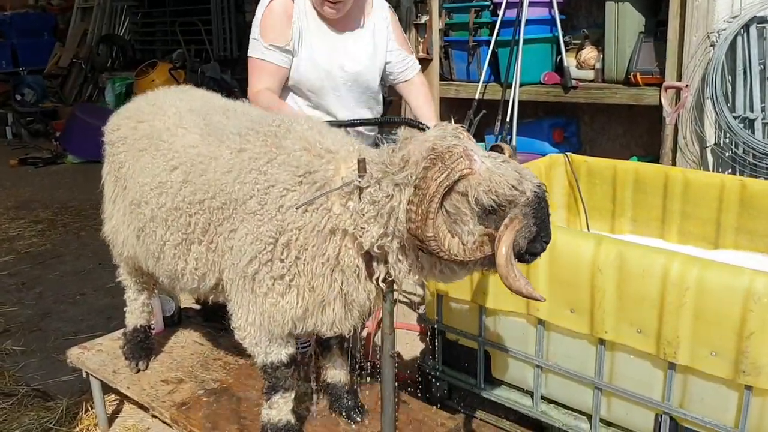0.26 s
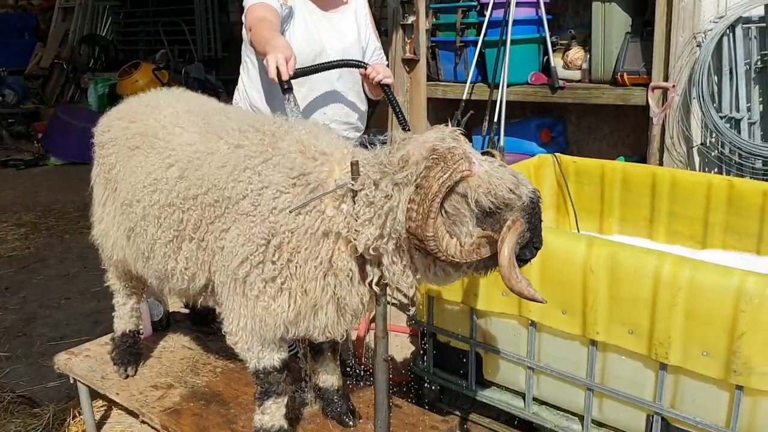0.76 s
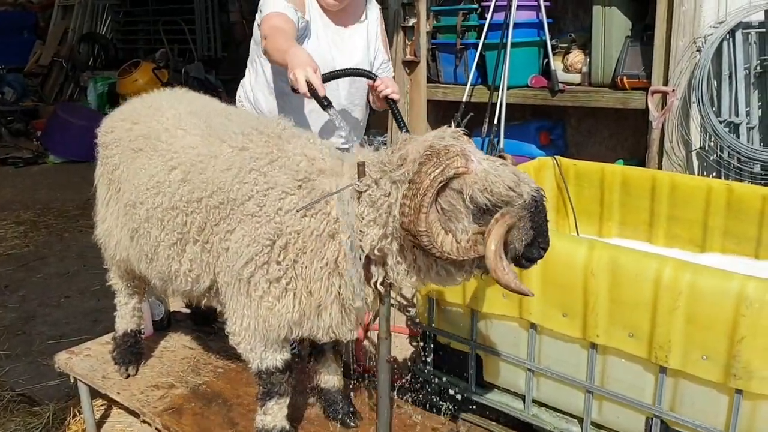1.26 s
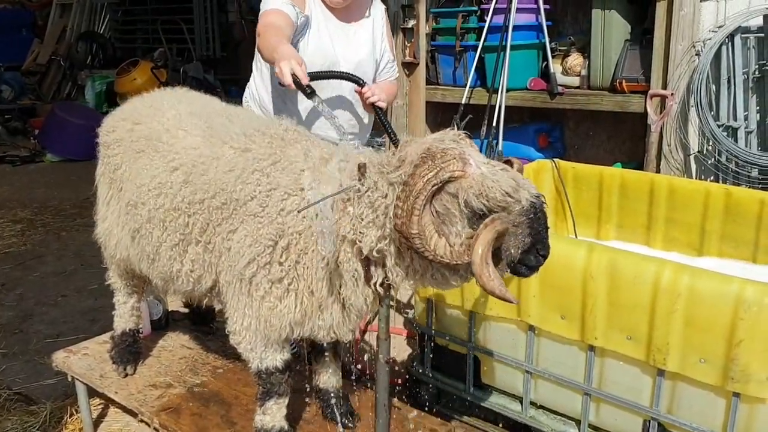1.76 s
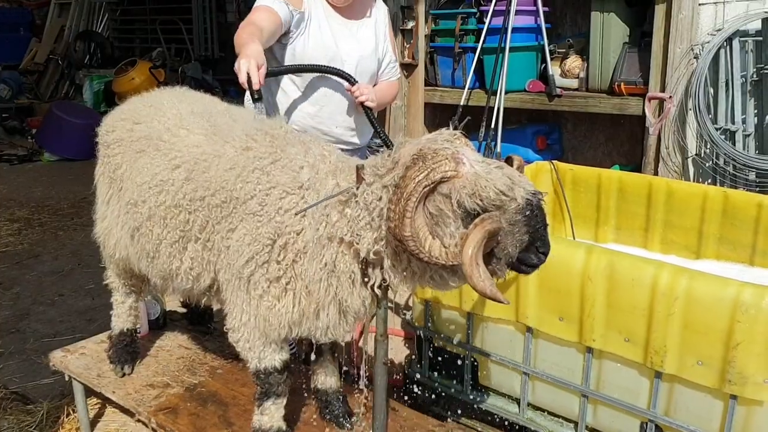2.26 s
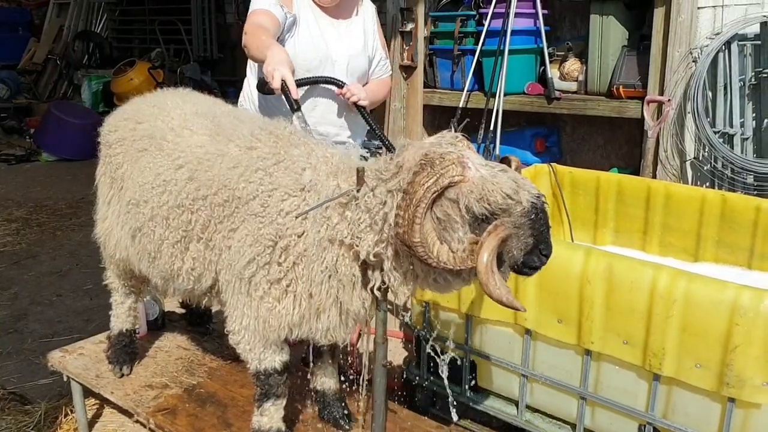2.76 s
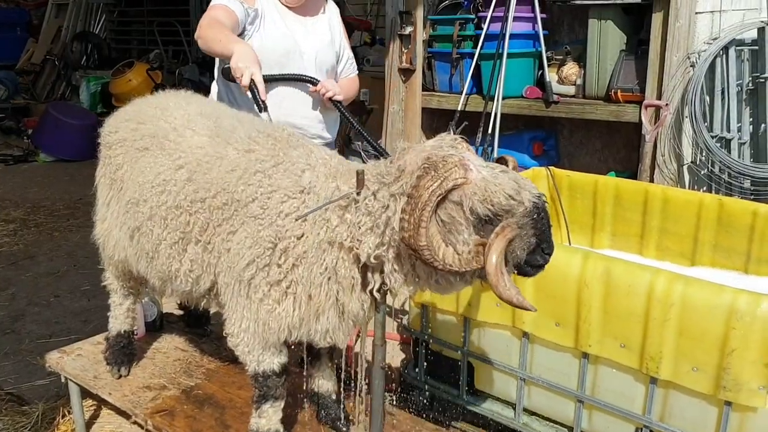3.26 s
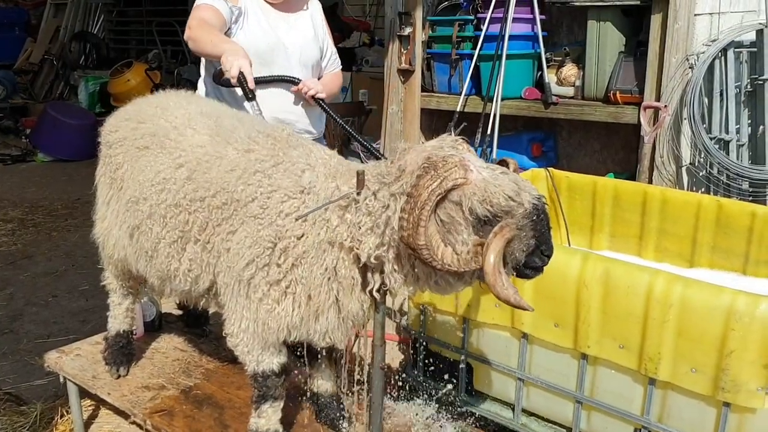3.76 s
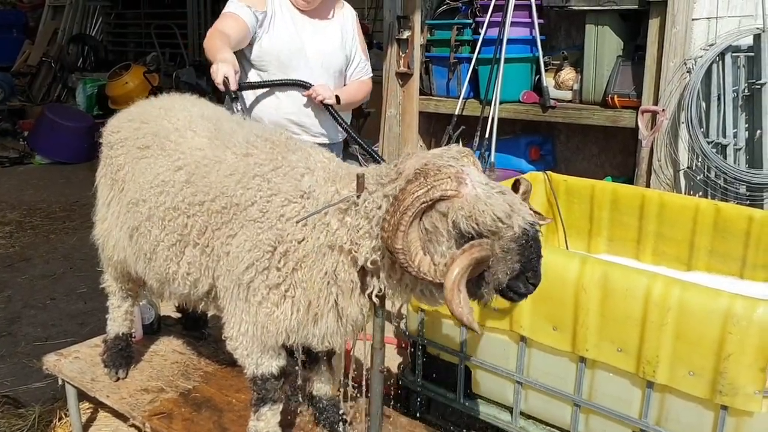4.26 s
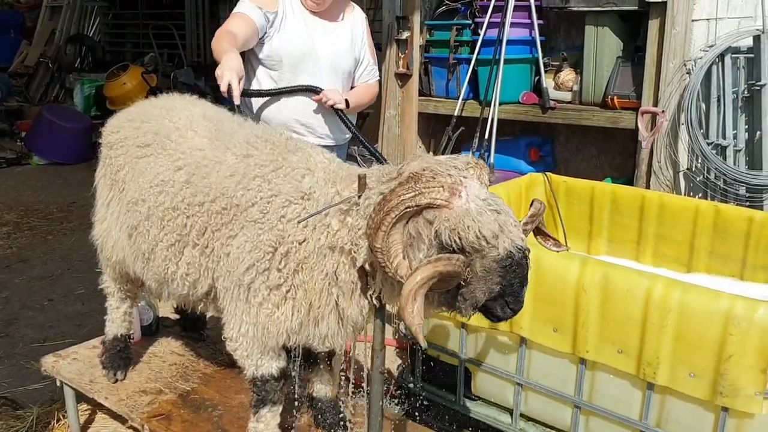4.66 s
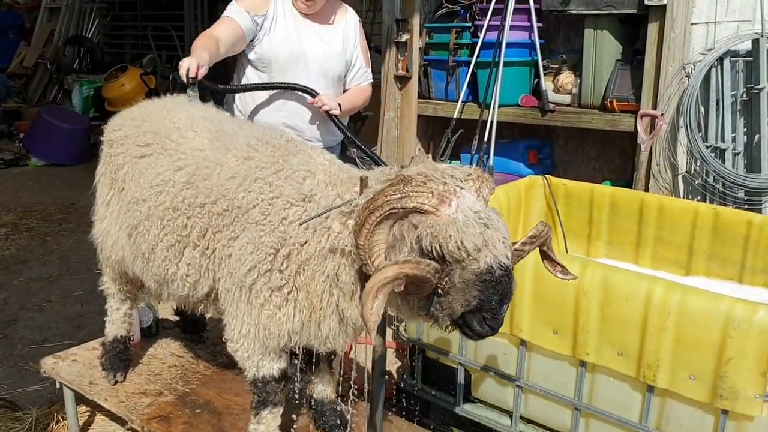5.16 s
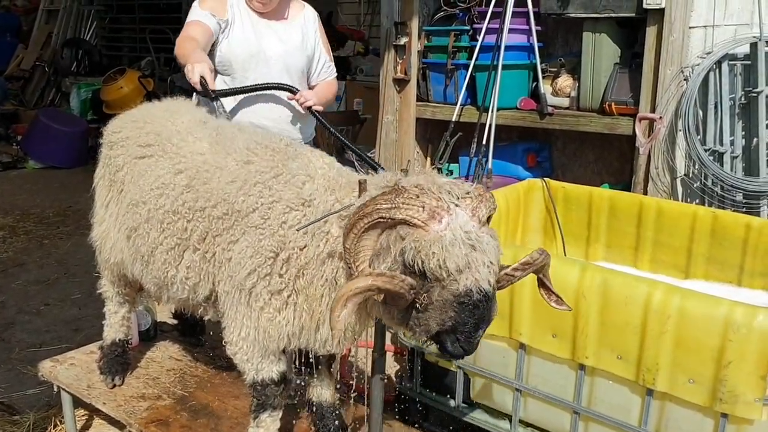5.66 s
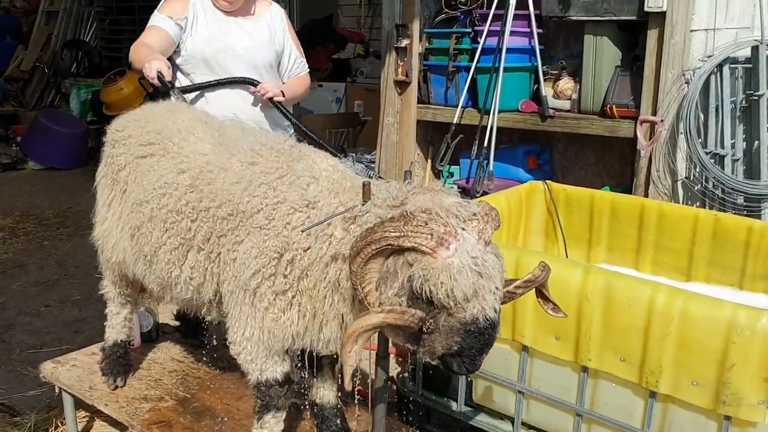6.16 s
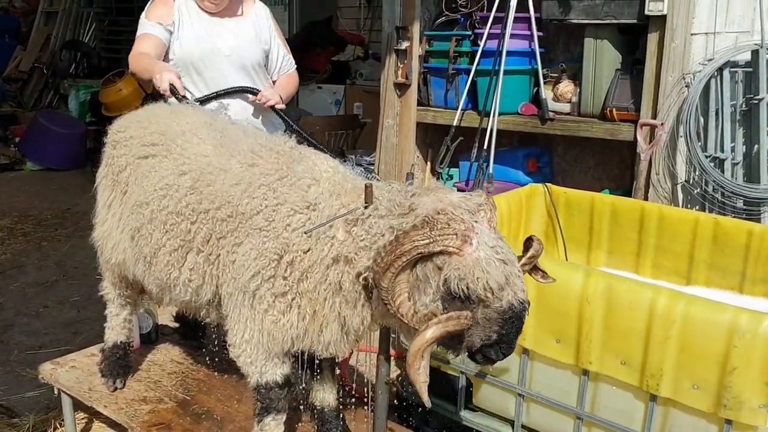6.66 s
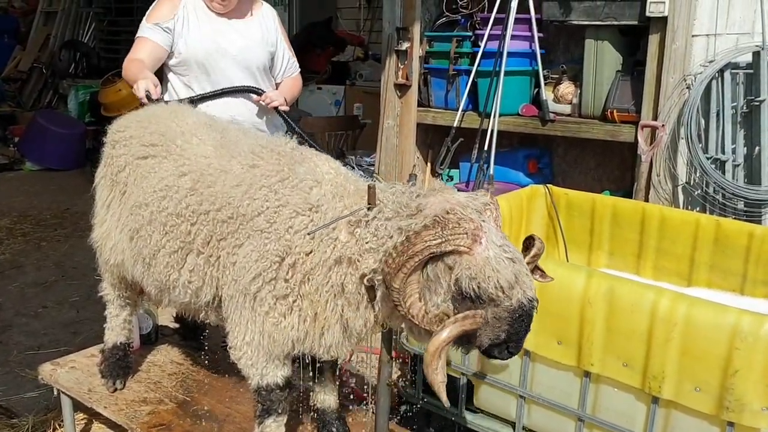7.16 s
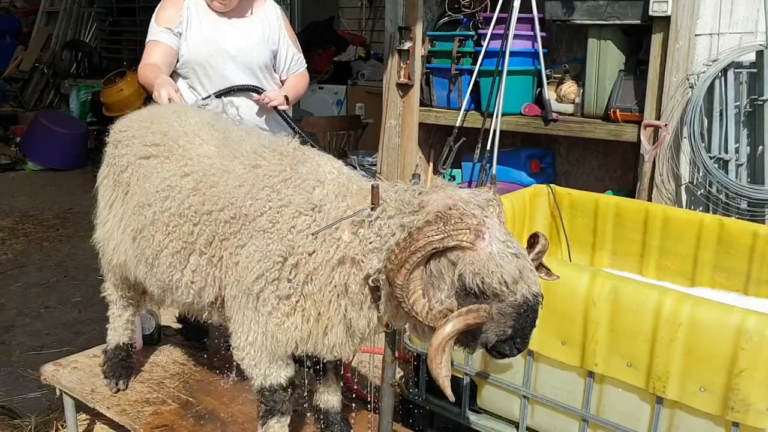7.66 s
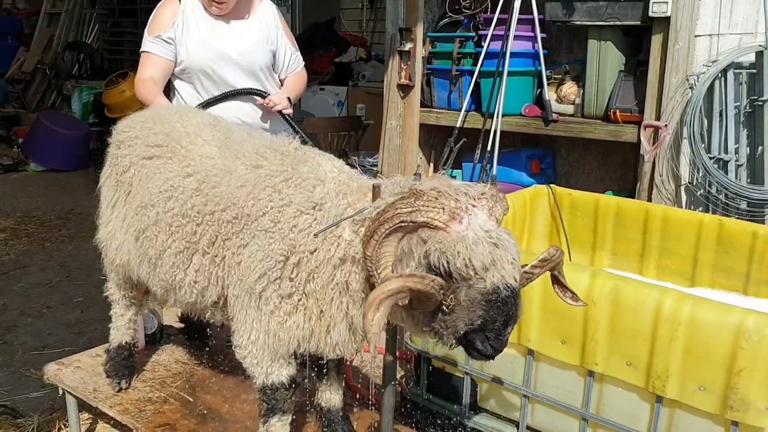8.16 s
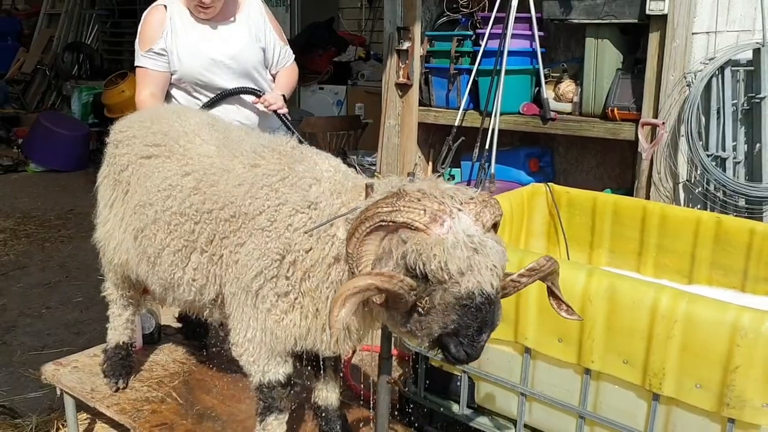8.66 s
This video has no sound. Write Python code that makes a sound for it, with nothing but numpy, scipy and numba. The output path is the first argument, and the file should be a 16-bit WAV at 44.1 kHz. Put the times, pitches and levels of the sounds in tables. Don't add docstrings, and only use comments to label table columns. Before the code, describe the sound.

A thin, fizzing dribble of hose water falls from wet wool onto a wooden table and soaked ground. A soft hoof shift comes first, then scattered drips and brighter bursts of splashing. Wind begins lightly, then buffets the microphone with deep uneven thumps from about five seconds, heaviest near eight. The place is an open yard beside a shed, with very short reflections and a low distant hum.

```python
import sys
import numpy as np
from scipy import signal
from scipy.fft import rfft, irfft, next_fast_len
from scipy.io import wavfile
from scipy.ndimage import uniform_filter1d, map_coordinates
from numba import njit

SR = 44100
rng = np.random.default_rng(int(sys.argv[2]) if len(sys.argv) > 2 else 0)


def digitize_waveform(pressure):
    field = np.atleast_2d(pressure).T
    bounded = np.clip(field, -1, 1)
    quanta = np.round(bounded * 32767).astype(np.int16)
    wavfile.write(sys.argv[1], SR, quanta)


def elevation(decibels):
    levels = np.asarray(decibels, float)
    return 10 ** (levels / 20)


N = 393358


def unit(x):
    return x / np.sqrt(np.mean(x ** 2) + 1e-20)


def along(points, hz):
    f, v = np.transpose(points)
    return np.interp(np.log(hz + 1), np.log(f + 1), v)


def curves(rows):
    s, *cols = np.transpose(rows)
    return [np.interp(np.arange(N) / SR, s, c) for c in cols]


def wobble(rate):
    knots = rng.standard_normal(int(N * 200 / SR) + 4)
    return map_coordinates(knots, [np.arange(N) * min(rate, 200) / SR])


def sides(pan_db):
    return np.array([elevation(pan_db / 2), elevation(-pan_db / 2)])


def coloured(x, spectrum):
    m = 2 * next_fast_len(N // 2 + 4096)
    gain = elevation(along(spectrum, np.fft.rfftfreq(m, 1 / SR)))
    ceps = irfft(np.log(gain + 1e-6), m)
    ceps[1:m // 2] *= 2
    ceps[m // 2 + 1:] = 0
    return irfft(rfft(x, m) * np.exp(rfft(ceps)), m)[..., :N]


# (frequency [Hz], left-right likeness [0-1])
ALIKE = [(60, 0.81), (290, 0.92), (640, 0.82), (1400, 0.36), (3100, 0.11), (7000, 0)]


def rush(spectrum, patchy_db):
    z = signal.stft(rng.standard_normal((2, N)), nperseg=512)[2]
    field = uniform_filter1d(rng.standard_normal(z.shape[1:]), size=6, axis=0)
    field = uniform_filter1d(field, size=8, axis=1)
    likeness = np.clip(along(ALIKE, np.fft.rfftfreq(512, 1 / SR)), -1, 1)
    turn = np.arccos(likeness)[:, None] / 2
    mid, side = z[0] * np.cos(turn), z[1] * np.sin(turn)
    patches = elevation(patchy_db * unit(field))
    pair = signal.istft(np.array([mid + side, mid - side]) * patches, nperseg=512)[1]
    return unit(coloured(pair[:, :N], spectrum))


@njit
def add(out, s, hz, size, cycles, rise, sr):
    for g in range(len(s)):
        first = int(s[g] * sr) + 1
        for i in range(max(first, 0), min(first + int(4 * cycles[g] * sr / hz[g]), len(out))):
            u = (i / sr - s[g]) * hz[g] / cycles[g]
            if hz[g] * (1 + rise * u) < sr / 2:
                envelope = (1 - np.exp(-3 * u)) * np.exp(-1.3 * u)
                out[i] += size[g] * envelope * np.sin(2 * np.pi * u * cycles[g] * (1 + rise * u / 2))


def plinks(s, hz, db, cycles, pan_db, lag, rise):
    out = np.zeros((2, N))
    for ear, way in zip(out, (1, -1)):
        add(ear, s + way * lag / 2, hz, elevation(db + way * pan_db / 2), cycles + 0 * s, rise, float(SR))
    return out


def impulses(s, db, pan_db):
    out = np.zeros((2, N))
    out[:, (s * SR).astype(int)] = elevation(db) * sides(pan_db)
    return out


def puffs(strikes, rise_s, short_s, long_s, long_db):
    t = np.arange(SR // 10) / SR
    swell = 1 - np.exp(-t / rise_s)
    lead = elevation(-14 - 60 * t / 0.017)
    decay = elevation(-60 * t / short_s) + elevation(long_db - 60 * t / long_s)
    shape = swell * decay + lead[0] * (1 - swell)
    return signal.fftconvolve(strikes, np.r_[lead[::-1], shape][None], axes=1)[:, len(t):len(t) + N]


def bursts(s, length_s, db, grow_db, rise_s, fall_s):
    t = np.arange(N) / SR
    gains = []
    for start, length, level, grow in zip(s, length_s, db, grow_db):
        end = start + length
        corners = [0, elevation(level - grow / 2), elevation(level + grow / 2), 0]
        gains.append(np.interp(t, [start - rise_s, start, end, end + fall_s], corners))
    return np.array(gains)


# (frequency [Hz], density [dB per Hz])
YARD = [(35, -47), (60, 0), (101, -2), (179, -5.5), (290, 1.5), (440, -9), (642, 2), (949, -10),
        (1370, -17.5), (1500, -9), (1950, -13), (3300, -120)]
# (time [s], level [dB])
HUM = [
    (0.0, -52.5),
    (3.8, -54.5),
    (3.9, -53),
    (6.76, -54.5),
    (7.8, -51),
    (8.5, -57),
    (8.92, -54),
]


def yard():
    return elevation(curves(HUM)[0] + 1.5 + 1.63 * wobble(8)) * rush(YARD, patchy_db=2.0)


# (frequency [Hz], density [dB per Hz])
BUFFET = [(12, -89), (30, -1.5), (70, 5), (120, -5), (250, -15), (500, -31.5), (1000, -75)]
# (time [s], length [s], buffet level [dB], growth over the gust [dB], left-right [dB])
GUSTS = [(0.24, 0.59, -73, 33, 6.5), (2.174, 0.15, -53, 1, -15), (2.377, 0.24, -53, -12, 1),
         (3, 0.37, -56.5, 5, 0), (3.65, 0.26, -78, 6, -4), (4.0, 0.46, -71, -4, -3),
         (6.5, 0.4, -63, -4, -15), (8.155, 0.2, -60, 3, -16), (4.708, 0.092, -54, 0, -27),
         (4.877, 0.36, -50, 19, -0.5), (5.383, 0.33, -48, 3, -16.5), (5.76, 0.64, -44, -7, -6),
         (6.877, 0.255, -47.5, 2, -9), (7.212, 0.29, -46, 10, -2), (7.513, 0.19, -35.5, 2, 3),
         (7.762, 0.28, -33, 11.5, 5), (8.456, 0.22, -59.5, 14, -24), (8.807, 0.14, -46, -3, -16)]
# (crest time [s], peak level [dB], pitch [Hz], left-right [dB])
EDDIES = [(4.747, -33, 96, -20), (5.119, -31, 91, 4), (5.239, -26, 70, 6), (5.385, -38, 110, 3),
          (5.432, -35, 110, 3), (6.163, -25, 120, 3), (6.197, -30, 65, 11), (7.541, -18.5, 62, 0),
          (5.301, -19.5, 83, 1), (5.336, -19.5, 95, -2), (5.522, -22, 69.5, -1), (5.551, -29, 98, -12),
          (5.752, -22, 103, -1), (5.847, -18.5, 99, 0), (5.934, -24, 105, 4), (6.002, -22, 103, 3),
          (6.119, -19, 101, -2), (6.398, -25, 88, -5), (7.041, -27.5, 77.6, -4), (7.526, -24, 66.4, 3),
          (7.593, -31, 86, 1), (7.628, -21.5, 70, 15), (7.666, -20.5, 156, 18.5), (7.713, -29, 82, -22),
          (7.759, -32, 61, -30), (7.844, -20, 89, 7), (7.879, -21, 67.6, 13), (7.92, -20.5, 132, 12),
          (7.953, -16, 86.4, 13), (7.981, -14, 87, -3), (8.031, -32, 81.5, 28), (8.089, -23, 164, 27),
          (8.629, -32, 97, -9)]


def wind():
    start, length_s, gust_db, grow_db, pan_db = np.transpose(GUSTS)
    calm = elevation(-68)
    gusts = sides(pan_db) @ bursts(start, length_s, gust_db, grow_db, rise_s=0.042, fall_s=0.056) + calm
    lumps = elevation(5.0 * np.minimum([wobble(13) + 0.91 * wobble(35) for ear in range(2)], 1.6))
    air = unit(lumps * coloured(rng.standard_normal((2, N)), BUFFET))
    s, db, hz, side_db = np.transpose(EDDIES)
    lag = 0.0061 * rng.standard_normal(len(s))
    thumps = plinks(s - 0.62 / hz, hz, db + 2.5, 0.83, side_db, lag, 0.017)
    thumps += plinks(s - 0.26 / hz, 1.9 * hz, db - 11.0, 0.7, side_db, 0, .04)
    push = gusts * air + thumps
    return push - 1.5 * (push ** 2 - uniform_filter1d(push ** 2, size=1500))


# (frequency [Hz], decay time t60 [s])
SHED = [
    (300, .08),
    (2500, .06),
    (12000, .035),
]


def shed(x):
    size = 8192
    blocks = np.pad(x, ((0, 0), (130, size - (N + 130) % size))).reshape(2, -1, size)
    hz, t, z = signal.stft(rng.standard_normal(blocks.shape), SR, nperseg=128)
    decay = elevation(-60 * t / along(SHED, hz)[:, None])
    tail = signal.istft(z * decay, SR, nperseg=128)[1][..., :size]
    wet = signal.fftconvolve(blocks, tail / np.linalg.norm(tail, axis=2, keepdims=True), axes=2)
    first = wet[..., :size].reshape(2, -1)
    later = np.pad(wet[..., size:], ((0, 0), (1, 0), (0, 1))).reshape(2, -1)
    return first[:, :N] + later[:, :N]


# (time [s], peak level [dB], pitch [Hz])
KNOCKS = [(0.502, -32.5, 495), (0.955, -30.5, 1200), (1.335, -36.5, 1220), (1.834, -29.5, 1210),
          (1.836, -35.5, 680), (1.969, -41, 370), (1.912, -36.5, 396), (2.031, -31, 1250),
          (2.846, -32, 1290), (4.928, -36, 575), (5.562, -34, 690), (5.601, -37, 723), (6.158, -29, 1770),
          (6.505, -33, 1240), (7.71, -33.5, 1130), (7.907, -30.5, 690)]
# (time [s], peak level [dB], pitch [Hz])
HOOF = [
    (0.238, -29.5, 110),
    (0.261, -34.5, 172),
    (0.282, -36, 105),
    (.553, -39, 109),
]


def table():
    s, db, hz = np.transpose(KNOCKS)
    modes = [(-.001, 0.967, 2.5, 5.4), (-.001, 1.5, 2, 3.2), (.005, 0.7, -3.4, 3.6)]
    plops = sum(plinks(s + after, hz * ratio, db + level_db, cycles, 0.92, 0, 0.057)
                for after, ratio, level_db, cycles in modes)
    step_s, step_db, step_hz = np.transpose(HOOF)
    return plops + plinks(step_s, step_hz, step_db, 1.9, 0, 0, 0.)


# (frequency [Hz], density [dB per Hz])
SPRAY = [(530, -57), (900, -21), (1390, -16.5), (2250, -4), (2900, -6.5), (3300, -12.5), (4400, -6),
         (5000, 1), (5800, -3.5), (6400, -12), (8600, -5), (9650, -10.5), (11400, -8), (16000, -19.5)]


def sprinkle(rows, cycles, ring_db, crack_db, rise_s, short_s, rebound_db):
    s, db, hz = np.transpose(rows)
    v = rng.standard_normal((len(s), 4))
    pan_db = 5.0 * v[:, 0]

    def ring(after, shift, change_db):
        level_db = db + ring_db + change_db
        return plinks(s + after, hz * np.exp(shift), level_db, cycles, pan_db, 6e-5 * v[:, 1], 0.013)

    blows = impulses(s - rise_s, db + crack_db, pan_db)
    crack = puffs(blows, rise_s, short_s, 0.037, -13) * rush(SPRAY, patchy_db=5.0)
    rebound = ring(0.0027 * np.exp(0.408 * v[:, 2]), 0.089 * v[:, 3], rebound_db)
    return crack + ring(-0.000359, 0, 0) + rebound


# (time [s], peak level [dB], pitch [Hz])
GLINTS = [(1.6101, -28, 7260), (1.6426, -20, 7190), (1.7066, -13, 7400), (2.097, -22.5, 8350),
          (2.1213, -21, 8400), (2.2645, -25, 7790), (3.1453, -21, 8500), (3.5657, -23, 8700),
          (3.986, -18.5, 8100), (5.894, -26, 8930), (6.1216, -23.5, 9000), (6.207, -23.5, 11800),
          (6.945, -27, 8630), (7.3432, -33, 8530), (8.0899, -22, 11000)]


def glints():
    swell_s = .0012
    return sprinkle(np.add(GLINTS, [swell_s, 0, 0]), 4.4, 8.5, -1.5, swell_s, .0045, -10)


# (time [s], peak level [dB], pitch [Hz])
SPECKS = [(0.0998, -23, 8400), (0.2914, -25, 4700), (0.5202, -29.5, 4650), (0.8869, -22, 8820),
          (0.9014, -25, 5460), (0.983, -22, 5030), (1.1613, -26, 5250), (1.211, -23.5, 4860),
          (1.6212, -23, 4200), (1.7737, -21.5, 5560), (1.8493, -23, 5290), (1.9196, -22, 5100),
          (1.9718, -19.5, 5900), (1.9904, -27, 4060), (2.158, -14.5, 4120), (2.2643, -28, 4370),
          (2.2912, -22, 4700), (2.5467, -20.5, 4830), (2.6725, -24.5, 5360), (2.733, -24, 5200),
          (2.9483, -27, 5160), (3.0515, -30, 5370), (3.1368, -27, 5370), (3.1867, -24, 5650),
          (3.3318, -21, 4860), (3.7419, -22, 5000), (3.7743, -19.5, 4810), (3.8344, -20, 5680),
          (4.157, -26, 5050), (4.5795, -22, 4890), (4.6974, -19.5, 5200), (4.8885, -21, 4860),
          (4.9434, -21, 5340), (5.013, -25, 5000), (5.1716, -22, 5210), (5.3958, -19.5, 5320),
          (5.4161, -21.5, 4950), (5.7498, -23, 5260), (6.207, -34, 5250), (6.982, -19.5, 5400),
          (7.2923, -25, 5180), (7.3437, -25, 5340), (7.665, -24.5, 5560), (7.7877, -32, 5270),
          (7.8603, -20.5, 4840), (7.8945, -21.5, 4970), (8.0286, -20, 4900), (8.0711, -23, 5010),
          (8.4976, -23, 5300), (8.5495, -18, 5130), (8.779, -19, 4970), (8.9017, -26, 4800)]


def specks():
    return sprinkle(SPECKS, 4.6, 4.9, -5.5, 0.001, 0.0097, -2)


# (time [s], peak level [dB], bubble pitch [Hz])
BEADS = [(0.0293, -30, 2260), (0.0628, -31.5, 1580), (0.0707, -26.5, 2210), (0.1017, -25.5, 2800),
         (0.1965, -29, 2670), (0.2568, -32, 2860), (0.2977, -31, 2910), (0.4773, -30, 2850),
         (0.6938, -29, 2400), (1.0191, -25, 2940), (1.3049, -27, 2330), (1.6172, -21.5, 3180),
         (1.6432, -31, 2140), (1.7734, -29, 2240), (1.9175, -36, 2320), (2.0388, -26.5, 2410),
         (2.1021, -27.5, 1500), (2.811, -33, 2600), (2.8374, -29, 1920), (2.877, -32, 2000),
         (2.9642, -34, 2220), (3.3169, -28, 2900), (3.3872, -27.5, 2480), (3.6865, -26.5, 2700),
         (3.7214, -28, 1990), (3.898, -30, 2320), (4.0113, -22, 2580), (4.0582, -24.5, 2280),
         (4.3385, -30, 2290), (4.4353, -38, 2780), (4.5032, -27, 2600), (4.559, -23, 2500),
         (4.5714, -25, 2430), (4.9546, -27, 2640), (5.1243, -27.5, 2850), (5.3288, -33, 2170),
         (5.4111, -28, 2430), (5.5298, -25, 2580), (5.6032, -23.5, 3000), (5.654, -34, 1970),
         (5.8661, -30, 2900), (6.0352, -27, 2480), (6.4777, -24.5, 3470), (7.0723, -32, 2940),
         (7.2579, -26, 2680), (7.2958, -27, 2710), (7.3796, -21.5, 2280), (7.9414, -33, 2860),
         (7.9862, -27.5, 2750), (8.094, -20, 3230), (8.1199, -24, 2320), (8.1339, -24, 2750),
         (8.2043, -23, 2190), (8.4213, -24, 3400), (8.526, -34, 1850), (8.7585, -27, 2270),
         (8.8802, -30, 1830)]


def beads():
    return sprinkle(BEADS, 5.4, 2.8, -5.0, 0.00096, 0.016, -2.5)


# (time [s], peak level [dB], pitch [Hz])
SPITS = [(0.39, -17, 5200), (1.494, -13.5, 5050), (1.684, -9.5, 4200), (1.708, -14, 3970),
         (1.868, -14.5, 5200), (2.122, -17, 5500), (2.377, -13, 4800), (2.5009, -11.5, 4800),
         (2.974, -12.5, 5200), (2.9982, -9.5, 5260), (3.039, -14, 4720), (3.116, -17, 4400),
         (3.702, -14, 5600), (3.8038, -12.5, 4900), (3.863, -8.5, 4900), (3.911, -10, 4830),
         (3.972, -14, 5430), (4.0388, -12.5, 4950), (4.5581, -5.5, 5670), (4.773, -13, 5100),
         (5.354, -15, 5300), (5.686, -20, 4670), (6.796, -16, 5100), (6.8823, -19, 4400),
         (7.031, -14.5, 5330), (7.3938, -5.5, 5200), (8.0905, -18, 5450), (8.1348, -10.5, 5160),
         (8.167, -15.5, 4870), (8.684, -16, 5100), (1.676, -20, 5000), (1.724, -16, 3470),
         (1.731, -19, 5070), (3.989, -15, 4500), (7.428, -19, 3920)]


def spits():
    s, db, hz = np.transpose(SPITS)
    v = rng.standard_normal((len(s), 6))
    pan_db = 3.6 + 2 * v[:, 5]

    def tick(after, shift, change_db, cycles):
        return plinks(s + after, hz * np.exp(shift), db + change_db, cycles, pan_db, 6e-5 * v[:, 0], 0.0069)

    blows = impulses(s - .001, db - 11.0, 0 * s)
    sound = puffs(blows, 0.0014, 0.014, 0.026, -8.5) * rush(SPRAY, patchy_db=-4.0)
    sound += tick(-0.000502, 0, 1.3, 4.5)
    sound += tick(0.0027 * np.exp(0.358 * v[:, 1]), 0.021 * v[:, 2], -1.2, 3.7)
    return sound + tick(0.0093 * np.exp(1.4 * v[:, 3]), 0.024 * v[:, 4], -1.0, 1.0)


# (time [s], peak level [dB], bubble pitch [Hz], splash level [dB])
DROPS = [(0.3867, -22.5, 2740, -8), (0.873, -18, 2500, -11), (0.928, -24, 1520, -11),
         (1.1185, -20.5, 2870, -27), (1.437, -26.5, 2920, -7), (1.6016, -23.5, 2680, -23),
         (1.6839, -6.5, 2220, -15), (1.868, -22, 2810, -8), (1.933, -20, 2430, -4.5),
         (1.977, -19, 3700, -14), (2.1223, -20.5, 2920, -11), (2.144, -12, 1900, -16),
         (2.172, -14, 2700, -8.5), (2.198, -21.5, 2470, -11), (2.418, -17.5, 2430, -9.5),
         (3.1626, -19, 2540, -16), (3.2433, -22.5, 2700, -4), (3.7613, -16, 2240, -22),
         (3.8048, -19, 2340, -7), (3.8367, -19, 2580, -3.5), (4.375, -23, 2520, -7),
         (4.7779, -17, 2530, -5), (5.35, -18.5, 2100, -6.5), (6.0576, -18.5, 2560, -4.5),
         (6.2492, -19, 2980, -8), (7.029, -22.5, 2630, -37), (7.1131, -14.5, 2370, -35),
         (7.229, -20, 2420, -24), (7.3952, -17.5, 2520, -25), (8.787, -17.5, 1820, -30)]
# (time [s], peak level [dB])
DRIPS = [(2.266, -31), (2.558, -24.5), (3.533, -28), (4.09, -25), (4.748, -27), (5.453, -26.5),
         (5.699, -30), (6.647, -24), (6.722, -24.5), (6.909, -32), (6.961, -25), (8.187, -21), ]
# (frequency [Hz], gain [dB])
DULL = [
    (500, -1),
    (5500, 0.5),
    (9000, -2.5),
    (16000, -15),
]


def drops():
    drip_hz, drip_splash_db = 2580, -8.5
    drips = [(s, db, drip_hz, drip_splash_db) for s, db in DRIPS]
    s, db, hz, splash_db = np.transpose(DROPS + drips)
    v = rng.standard_normal((len(s), 9))
    pan_db = -0.5 + 2.5 * v[:, 8]
    lag = -1.2e-5 * pan_db + 4e-5 * v[:, 0]
    sound = plinks(s - .0008, hz, db + 6.0, 2.63, pan_db, lag, 0.034)
    sound += plinks(s + .0002, 1.73 * hz, db + 1.0, 1.8, pan_db, lag, 0.)
    for k, (after, change_db) in enumerate([(.0021, 1), (.0052, -5), (.0105, -10.5)]):
        late_s = s + after * np.exp(0.5 * v[:, 1 + k])
        small_hz = hz * np.exp(0.27 + 0.22 * v[:, 4 + k])
        sound += plinks(late_s, small_hz, db + change_db + 2 * v[:, 7], 3.2, pan_db, lag, 0.043)
    blows = impulses(s - .003, db + splash_db - 4.0, pan_db)
    hiss = coloured(rush(SPRAY, patchy_db=2.0), DULL)
    return sound + puffs(blows, 0.0024, 0.025, 0.064, 2) * hiss


def patter(low_hz, high_hz, cycles, spread_db, clump_db, wide, count):
    u, v = rng.random((count, 3)), rng.standard_normal((count, 3))
    s, hz = u[:, 0] * N / SR, low_hz * (high_hz / low_hz) ** u[:, 1]
    crowding = np.clip(0.42 * wobble(22) + wobble(50) + 0.7 * wobble(110), -4, 1.7)
    clumps = crowding[(u[:, 0] * N).astype(int)]
    db = -spread_db * np.log(u[:, 2] + 0.042) + clump_db * clumps + 10 * np.log10(hz ** 2)
    return plinks(s, hz, db, cycles * np.exp(0.43 * v[:, 0]), 3 * v[:, 1], wide * v[:, 2], 0.015)


def mist(spread_db, bed, count):
    u = rng.random((count, 3))
    strikes = impulses(u[:, 0] * N / SR, -spread_db * np.log(u[:, 1] + 0.015), 8 * (u[:, 2] - .5))
    swell = bed + unit(puffs(strikes, .004, 0.013, 0.039, -15))
    hiss = rush(SPRAY, patchy_db=1.6)
    return unit(swell * elevation(1.3 * wobble(40)) * hiss)


# (time [s], strength [dB])
FLOW = [(0, -40), (.9, -40), (1.55, -42.5), (2.05, -41), (2.45, -42.5), (2.75, -46), (3.25, -39),
        (3.44, -44.5), (3.68, -43.5), (4.25, -41.5), (4.9, -38.5), (5.28, -42.5), (5.5, -39), (6.4, -42),
        (7.2, -40), (7.5, -42), (7.64, -38.5), (8.4, -40.5), (8.92, -40)]
# (time [s], length [s], spray [dB], splatter over spray [dB])
GUSHES = [(0.905, 0.063, -39.5, -13), (1.615, 0.04, -31, -9), (1.674, 0.064, -31.5, -1.5),
          (1.812, 0.037, -34, 1), (1.92, 0.043, -37, -15), (2.074, 0.038, -41, 6), (2.148, 0.026, -32, -8),
          (2.188, .035, -33.5, -12), (1.845, 0.033, -43, -7), (4.144, 0.061, -38.5, -7),
          (2.373, 0.023, -43, -12), (2.493, 0.026, -36.5, 0), (2.81, 0.1, -46.5, 8),
          (2.975, 0.085, -34, -10), (3.136, 0.056, -30.5, -13), (3.243, 0.15, -37.5, -15),
          (3.699, 0.16, -35, -6), (3.804, 0.333, -31, -6.5), (4.554, 0.044, -37.5, 2.5),
          (4.747, 0.056, -37, 2), (4.885, 0.1, -38.5, -8), (5.36, 0.13, -39, 0.5), (5.64, 0.067, -38, -19),
          (8.415, 0.031, -42, 0), (6.908, 0.058, -37.5, -6), (7.032, 0.027, -40, 3),
          (7.129, 0.13, -31.5, -8), (7.302, 0.13, -29.5, -4), (7.792, 0.15, -35.5, -4.5),
          (7.953, 0.3, -33.5, -11), (8.666, 0.016, -37, -1), (8.763, 0.057, -31.5, -0.5),
          (8.837, 0.072, -33, -2)]
# (frequency [Hz], density [dB per Hz])
SPLAT = [(500, -68), (900, -8), (1400, -5), (2250, 3.5), (2850, -10), (3500, -4.5), (5200, -2.5),
         (7000, -35), (15000, -65)]


def runoff():
    flow_db, = curves(FLOW)
    s, length_s, db, coarse_db = np.transpose(GUSHES)
    gush = bursts(s, length_s, db - 4.5, 0 * s, rise_s=0.0028, fall_s=0.021) ** 2
    spray_gain = np.sqrt(elevation(flow_db) ** 2 + gush.sum(axis=0))
    dribble_db = flow_db.mean() + 3 * (flow_db - flow_db.mean()) - 8
    splat_gain = np.sqrt(elevation(dribble_db) ** 2 + elevation(coarse_db) ** 2 @ gush)
    fizz = unit(coloured(patter(2612, 6490, 5.7, 4.4, 3.27, 1.3e-4, count=15000), SPRAY))
    ticks = unit(coloured(patter(6440, 13240, 5.0, 4.7, 0.43, 0.000138, count=2500), SPRAY))
    spray = unit(elevation(0.5) * fizz + mist(4.8, 2.2, count=900) + elevation(-10.5) * ticks)
    slaps = unit(coloured(patter(963, 5240, 2.46, 4.9, 3.6, 0.9e-4, count=8000), SPLAT))
    return sides(0.53)[:, None] * (elevation(2.0) * spray_gain * spray + elevation(-2.5) * splat_gain * slaps)


def scene():
    near = runoff() + drops() + spits() + table() + beads() + specks() + glints()
    return near + elevation(-10.0) * shed(near) + yard() + wind()


# (frequency [Hz], right over left [dB])
RIGHT_BRIGHTER = [
    (6000, -0.5),
    (14000, 1.5),
]


def ports(dry):
    hz = np.fft.rfftfreq(N, 1 / SR)
    notches = 1 - 0.42 * np.exp(-((hz - 6220) / 240) ** 2)
    notches -= 0.29 * np.exp(-((hz - 9600) / 290) ** 2)
    tilt = sides(-along(RIGHT_BRIGHTER, hz))
    left_leads_s, top_hz = 3e-5, 15740
    lead = np.exp(np.outer([1, -1], 1j * np.pi * hz * left_leads_s))
    return irfft(rfft(dry) * notches * tilt * (hz < top_hz) * lead, N)


def low_pass(x):
    return signal.sosfilt(signal.butter(12, 16210, fs=SR, output="sos"), x)


def record(dry):
    heard = ports(dry)
    return low_pass(heard)


dry = scene()
out = record(dry)
digitize_waveform(out)
```